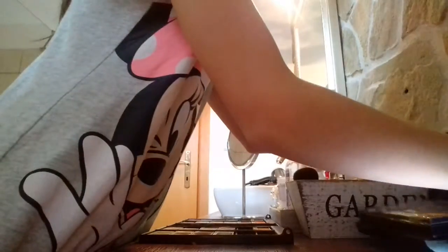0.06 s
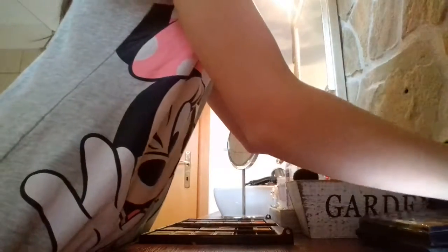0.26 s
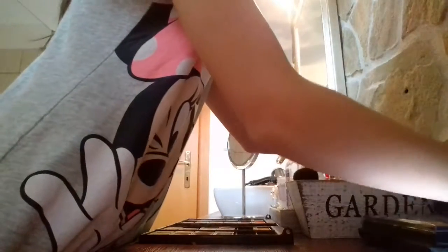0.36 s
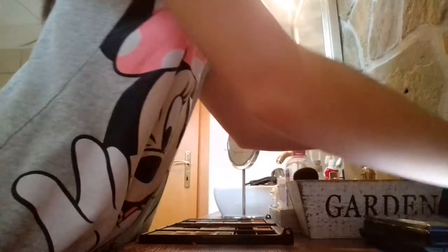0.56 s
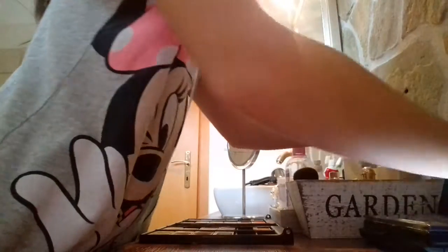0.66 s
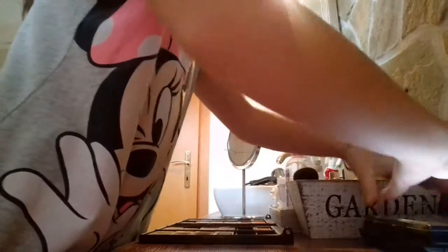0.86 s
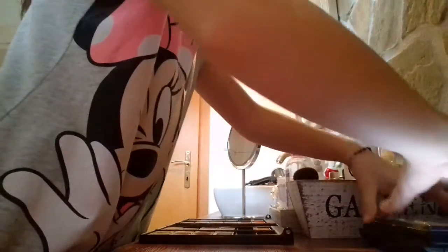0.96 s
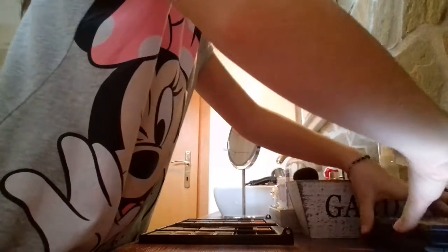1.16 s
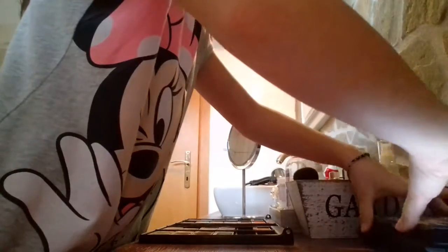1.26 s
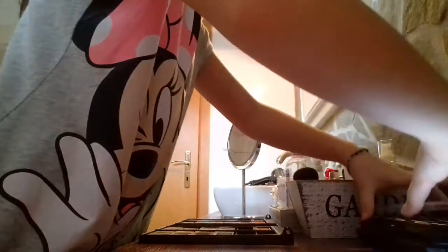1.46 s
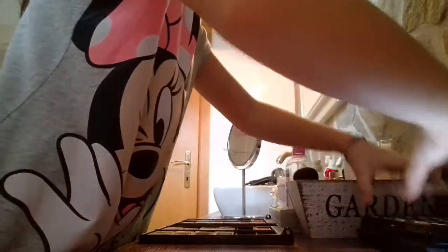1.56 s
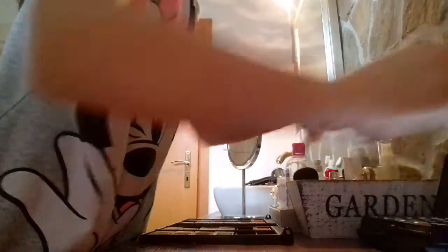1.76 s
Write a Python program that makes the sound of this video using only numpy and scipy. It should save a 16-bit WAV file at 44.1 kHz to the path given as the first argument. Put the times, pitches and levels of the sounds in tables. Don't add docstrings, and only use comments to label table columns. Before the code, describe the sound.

Plastic makeup palettes clack sharply on a wooden tabletop, then rattle and scrape softly indoors

```python
import sys
import numpy as np
from scipy import signal
from scipy.io import wavfile
from scipy.ndimage import uniform_filter1d

SR = 44100
rng = np.random.default_rng(int(sys.argv[2]) if len(sys.argv) > 2 else 0)


def file_out(sig):
    cols = np.atleast_2d(sig).T
    lim = np.clip(cols, -1, 1)
    pcm = np.round(lim * 32767).astype(np.int16)
    wavfile.write(sys.argv[1], SR, pcm)


def magnitude_from_level(level_db):
    exponent = np.asarray(level_db, float) / 20
    return 10 ** exponent


N = 79380

# frequency in Hz, level in dB.
SCRAPE_COLOUR = [(300, -5), (800, 5), (1400, 4.5), (2500, -1), (4200, -0.5), (7000, -15.5), (14000, -14.5)]
# frequency in Hz, gain in dB.
MIC_RESPONSE = [(40, -15), (200, -1.5), (1000, 1), (4400, 2.5), (5000, -6.5), (6500, -8), (9000, -13),
                (16000, -23)]
EDGE_HZ, EDGE_OCTAVES = 4480, 0.88


def read(points, hz):
    f, value = np.transpose(points)
    return np.interp(np.log(hz + 1), np.log(f + 1), value)


def evened(x):
    return x / np.sqrt(np.mean(x ** 2) + 1e-20)


def smoothed(x, size, axis=-1):
    return uniform_filter1d(uniform_filter1d(x, size=size, axis=axis), size=size, axis=axis)


def add(mix, s, sound):
    part = mix[max(round(s * SR), 0):][:len(sound)]
    part += sound[:len(part)]


def colour(x, gain_db):
    half = np.log(magnitude_from_level(gain_db(np.fft.rfftfreq(4096, 1 / SR))))
    full = np.r_[half, half[-2:0:-1]]
    response = np.fft.ifft(np.exp(np.conj(signal.hilbert(full)))).real[:2048]
    return signal.oaconvolve(x, response)[:len(x)]


def hump(hz, mid_hz, octaves):
    return np.exp(-(np.log2((hz + 1) / mid_hz) / octaves) ** 2)


def ring(modes, seconds, wobble):
    detune = 0.022
    t = np.arange(round(seconds * SR))[:, None] / SR
    hz, db, t60 = np.transpose(modes)
    phase = 2 * np.pi * (hz * (1 + detune * wobble) * t + 7 * wobble)
    return (magnitude_from_level(db - 60 * t / t60) * np.sin(phase)).sum(1)


def snap():
    fade_s = 0.00043
    return np.diff(rng.uniform(-1, 1, 200)) * np.exp(-np.arange(199) / SR / fade_s) / 2


def puff(sound, shape):
    air_db = -39.5
    click = np.eye(1, 2048)[0]
    pulse = colour(click, lambda hz: 20 * np.log10(shape(hz) + magnitude_from_level(air_db)))
    return pulse * np.linalg.norm(sound) / np.linalg.norm(pulse)


def drift():
    # time in seconds, gain in dB.
    settling = [(0, 4), (.3, 5.5), (.7, 6.5), (1.0, 2.5), (1.8, 1)]
    return magnitude_from_level(np.interp(np.arange(N) / SR, *np.transpose(settling)))


def room_tone():
    # frequency in Hz, level in dB.
    murmur = [(30, -6.5), (60, 0.5), (100, 2.5), (250, -3.5), (600, -2), (1500, -6.5), (3000, -10),
              (5000, -23.5)]
    # frequency in Hz, level in dB.
    difference = [(30, -27.5), (100, -9.5), (350, -13), (900, -6), (3700, -11), (6000, -21), (9000, -45.5)]
    tone = colour(rng.standard_normal(N), lambda hz: read(murmur, hz))
    apart = colour(rng.standard_normal(N), lambda hz: read(difference, hz) - read(MIC_RESPONSE, hz))
    return drift() * magnitude_from_level(-70.5) * evened(tone), drift() * magnitude_from_level(-75.5) * evened(apart)


def contact(level_db, case_hz, edge_db, length):
    # pitch as a ratio to the case pitch, level in dB, t60 in seconds.
    case_modes = [(0.401, -12, 0.017), (0.619, -14.5, .025), (.87, -9.5, 0.033), (1.03, -0.5, 0.011),
                  (1.192, -0.5, 0.01), (1.498, -2, 0.0099)]
    # frequency in Hz, level in dB, t60 in seconds.
    edge_modes = [(1920, -4, .015), (2170, -3, 0.016), (2500, -1, 0.025), (2945, -1, 0.018),
                  (3310, -4.5, 0.029), (3590, -4.5, 0.023), (3957, 6.5, 0.0073), (4374, 1, 0.014),
                  (5200, -5, 0.0045), (6800, -6, 0.0045), (8190, -20, 0.0016), (12500, -19, .003)]
    impacts_per_s, case_rise_s, case_lag_s = 3000, 0.0026, 0.0033
    t = np.arange(900) / SR
    impacts = rng.uniform(-1, 1, 900) * (rng.random(900) < impacts_per_s / SR)
    impacts *= np.exp(-(t / length) ** 2)
    impacts[0] = 1.5
    edge = np.convolve(impacts, ring(edge_modes, .03, rng.uniform(-1, 1, len(edge_modes))))
    tuned = [(ratio * case_hz, db, t60) for ratio, db, t60 in case_modes]
    case = np.convolve(impacts, ring(tuned, .06, rng.uniform(-1, 1, len(tuned))))
    case *= 1 - np.exp(-np.arange(len(case)) / SR / case_rise_s)

    out = np.zeros(SR // 8)
    add(out, 0, magnitude_from_level(edge_db) * edge / abs(edge).max())
    add(out, 0, magnitude_from_level(edge_db - 18.5) * snap())
    lag = case_lag_s * magnitude_from_level(0.58 * (level_db + 9))
    add(out, lag, case / abs(case).max())

    def broad(hz):
        rim = magnitude_from_level(edge_db - 13.5) * hump(hz, EDGE_HZ, EDGE_OCTAVES)
        deep = magnitude_from_level(-13) * hump(hz, 450, .6)
        return hump(hz, case_hz, 0.99) + rim + deep

    room_db = level_db + .08 * (level_db + 14)
    return magnitude_from_level(level_db) * out, magnitude_from_level(room_db) * puff(out, broad)


def thump(s, level_db, centre_hz, octaves):
    # frequency in Hz, level in dB, t60 in seconds.
    table_modes = [(84, 5, 1.0), (107.8, 8, 0.6), (136.2, 4.5, 0.55), (159.8, -1, 0.53), (190, 0, 0.53),
                   (256.3, 1, .5), (270, -6, .3), (350, -3, .3), (641, -8, .2), (310, -1, 0.22),
                   (422, -7.5, 0.41), (528, 2.5, 0.093)]
    swell_s = .008
    modes = [(f, db - 9 * (np.log2(f / centre_hz) / octaves) ** 2, t60) for f, db, t60 in table_modes]
    sound = ring(modes, .9, np.full(len(modes), s * 1e-3))
    return magnitude_from_level(level_db) * sound * (1 - np.exp(-np.arange(len(sound)) / SR / swell_s))


def slide(length, level_db, tilt_db):
    grains_per_s, spread_db = 5400, 5.5
    count = round(length * SR)
    u = np.arange(count) / (length * SR)
    a, b = rng.random((2, count))
    strength = magnitude_from_level(-spread_db * np.log(abs(2 * b - 1) + 1 / 30))
    grit = (a < grains_per_s / SR) * np.sign(b - .5) * strength
    rough = colour(grit, lambda hz: read(SCRAPE_COLOUR, hz) + tilt_db * np.log2((hz + 50) / 1500))
    return magnitude_from_level(level_db) * np.sin(np.pi * u ** 0.51) ** 0.66 * evened(rough)


def tap(level_db, pitch_hz, t60, snap_db):
    split_hz, rise_s = 110, 0.0011
    pair = [(pitch_hz - split_hz, 0, 1.2 * t60), (pitch_hz + split_hz, 0, t60)]
    out = ring(pair, 0.074, np.zeros(2))
    out = out * (1 - np.exp(-(np.arange(len(out)) / SR / rise_s) ** 2))
    out = out / abs(out).max()
    add(out, 0, magnitude_from_level(snap_db + 12) * uniform_filter1d(snap(), size=5))

    def narrow(hz):
        return hump(hz, pitch_hz, .25) + magnitude_from_level(snap_db - 11.5) * hump(hz, EDGE_HZ, EDGE_OCTAVES)

    return magnitude_from_level(level_db) * out, magnitude_from_level(level_db - 11) * puff(out, narrow)


def room():
    # frequency in Hz, t60 in seconds.
    decay = [(100, 1), (260, 0.76), (700, 0.54), (1840, 0.42), (4850, 0.47), (10000, 0.23)]
    spread_db, lump_db, start_s, build_s = 3, 2.5, 0.0015, 0.00062
    echoes, slots = np.zeros(SR), np.arange(0, SR - 20, 20)
    a, b, c = rng.random((3, len(slots)))
    echoes[slots + (a * 20).astype(int)] = np.sign(b - .5) * magnitude_from_level(-spread_db * np.log(c + 1 / 20))
    hz, t, z = signal.stft(echoes, SR, nperseg=256)
    lumps = uniform_filter1d(rng.standard_normal(z.shape), size=3, axis=0)
    lumps = evened(uniform_filter1d(lumps, size=4, axis=1))
    fade_db = lump_db * lumps - 60 * t / read(decay, hz)[:, None]
    tail = signal.istft(z * magnitude_from_level(fade_db), SR, nperseg=256)[1][:SR]
    age = np.maximum(np.arange(SR) / SR - start_s, 0)
    tail = tail * (1 - np.exp(-age / build_s))
    return tail / np.linalg.norm(tail)


def scene():
    # start in seconds, level in dB, case pitch in Hz,
    # edge tick against the case in dB, rattle length in seconds.
    clacks = [(.002, -41.5, 1204, -0.5, 0.0069), (0.2014, -12.5, 1300, 3, .002),
              (0.4304, -31, 1300, 3, .003), (0.4346, -28, 1040, 2, 0.004),
              (0.4552, -13, 1303, -1.5, 0.0019), (0.4587, -17.5, 1136, -2.5, 0.0033),
              (0.471, -20, 1210, -7.5, .006), (0.492, -27.5, 1110, -1.5, 0.004),
              (1.097, -62, 1000, 5, 0.006), (1.247, -49, 1290, -1, 0.0026), (1.2859, -42.5, 1182, 2, 0.003),
              (1.295, -46, 1100, 0, 0.003), (.4642, -21, 1140, -3.5, .002), (0.495, -25.5, 1154, 0, .003),
              (0.2292, -24, 1305, -4.5, .003), (.239, -25, 1200, -4.5, .003), (0.522, -30, 1100, -5, .003),
              (.536, -31, 1094, -3.5, .003), (.548, -31.5, 1080, -4, .003), (0.5808, -38, 1030, -6, .003),
              (1.244, -47, 1200, -2, .001), (1.2075, -53, 1420, 0.5, .002), (1.092, -58, 1000, 6, .002),
              (.2028, -28, 1500, 10, .001), (1.2878, -46, 1200, 2, .001), (1.0715, -64, 1200, 4, .002),
              (1.114, -62, 1300, 0, .003), (1.5705, -53, 1500, 2, .001)]
    # start in seconds, level in dB, favoured pitch in Hz,
    # spread in octaves.
    blows = [(.002, -64, 190, 0.52), (.09, -43, 450, 0.2), (0.099, -98, 166, 0.4), (0.199, -54, 190, 0.7),
             (0.288, -63, 151, 0.41), (0.453, -48.5, 139, 0.86), (.455, -52, 300, .3),
             (0.823, -54, 260, 0.4), (.834, -49.5, 528, 0.25), (1.218, -73.5, 150, 0.5),
             (1.285, -60, 210, 0.4)]
    # start in seconds, length in seconds, level in dB,
    # treble tilt in dB per octave.
    strokes = [
        (0.025, .13, -56, -1),
        (0.755, 0.04, -58.5, -2),
        (1.054, 0.2, -71, 5),
        (1.195, 0.22, -64.5, -1.5),
        (1.563, 0.094, -67.5, -4),
        (0.455, .08, -52, 8),
        (.055, .045, -60, 4),
    ]
    # start in seconds, level in dB, pitch in Hz, t60 in seconds,
    # snap against the ring in dB.
    light_taps = [(.0675, -44, 1400, 0.047, -6), (.080, -44.5, 1390, 0.035, 1),
                  (.1065, -39, 1337, 0.031, -27), (.125, -44.5, 1355, 0.023, -35),
                  (0.259, -47, 7000, 0.0038, 0.5), (0.316, -31, 5350, 0.0036, -0.5),
                  (0.498, -41, 7500, 0.002, 8), (.757, -58, 1630, .05, -18), (.768, -48, 1615, .04, -9),
                  (0.7793, -45, 1990, 0.03, -10), (.818, -44.5, 1305, 0.0095, -14),
                  (.8246, -30.5, 1400, 0.014, -30), (0.8246, -45, 2500, 0.011, -15),
                  (0.8305, -44, 1350, 0.06, -32), (.278, -31, 2570, 0.078, -18),
                  (.107, -45, 2970, .008, -0.5), (1.4, -65, 4420, 0.02, -8),
                  (1.074, -60.5, 3980, .02, -4.5), (1.2077, -57, 1415, 0.009, -5),
                  (1.2076, -54.5, 3720, .012, -5), (1.571, -52.5, 1276, 0.023, 0.5),
                  (1.571, -56, 2900, .006, 0), (1.643, -64, 3390, .015, 3), (1.757, -67, 3800, .008, 0),
                  (.757, -58, 4310, 0.041, -12), (.773, -56, 4200, 0.036, -12),
                  (0.786, -60, 4500, .03, -12), (.1998, -37, 1800, 0.005, -25),
                  (.4345, -46, 6840, .002, 10), (1.2865, -51, 5960, .005, 0)]

    tone, apart = room_tone()
    near, sent, table = np.zeros((3, N))
    for source, rows in ((contact, clacks), (tap, light_taps)):
        for s, *settings in rows:
            direct, spread = source(*settings)
            add(near, s, direct)
            add(sent, s, spread)
    for s, *settings in strokes:
        scrape = slide(*settings)
        add(near, s, scrape)
        add(sent, s, scrape)
    for row in blows:
        add(table, row[0], thump(*row))

    near = colour(near, lambda hz: -40 / (1 + (hz / 300 * 2) ** 3))
    sent = colour(sent, lambda hz: -12 / (1 + (5200 / (hz + 1)) ** 8))
    table *= magnitude_from_level(2.5 * evened(smoothed(rng.random(N) - .5, 900)))

    spot = np.searchsorted([.42, .47, .7], np.arange(N) / SR)
    wet = sum(signal.fftconvolve(sent * (spot == k), room())[:N] for k in range(4))
    old = colour(room()[2000:], lambda hz: read(SCRAPE_COLOUR, hz))
    add(table, 0, magnitude_from_level(-58.5) * old / old[:2000].std())

    side = apart + magnitude_from_level(-60.5) * signal.fftconvolve(sent, room())[:N]
    mid = near + magnitude_from_level(-2.5) * wet + table + tone
    return np.array([mid + side, mid - side])


def top_cut(x):
    return signal.sosfilt(signal.butter(12, 16160, fs=SR, output="sos"), x)


def record(dry):
    # frequency in Hz, width in Hz, depth in dB.
    port_dips = [(10010, 290, -19), (14750, 600, -1.5)]
    top_hz, limit, offset = 15780, 1.2, -0.00046

    def hiss_colour(hz):
        return -10 / (1 + (hz / 4200) ** 4)

    def dips(hz):
        depth = sum(d * np.exp(-((hz - f) / w) ** 2) for f, w, d in port_dips)
        return depth - 60 * (hz > top_hz)

    noise = rng.standard_normal((3, N))
    heard = []
    for channel, own in zip(dry, noise[:2]):
        hiss = colour(own + 0.22 * noise[2], hiss_colour)
        voice = colour(channel, lambda hz: read(MIC_RESPONSE, hz))
        heard.append(colour(voice + drift() * magnitude_from_level(-75.5) * hiss, dips))
    return top_cut(limit * np.tanh(np.array(heard) / limit) + offset)


dry = scene()
out = record(dry)
file_out(out)
```